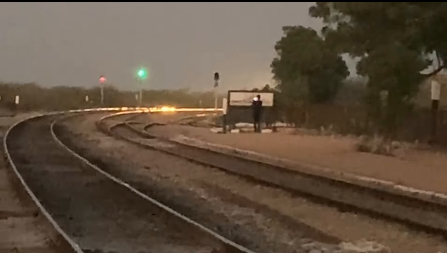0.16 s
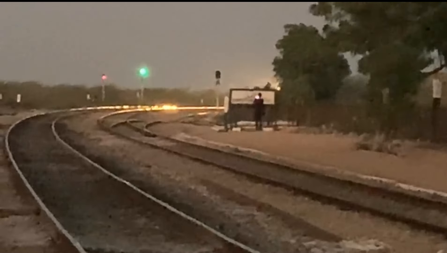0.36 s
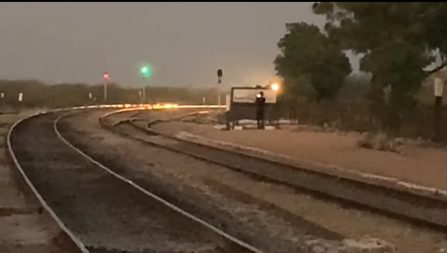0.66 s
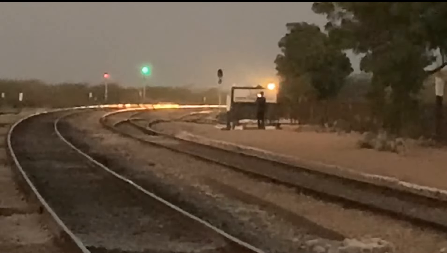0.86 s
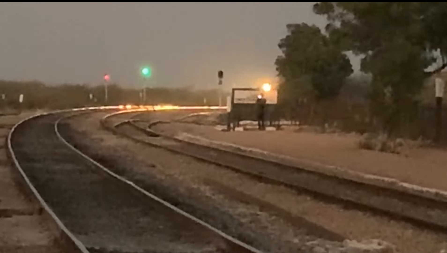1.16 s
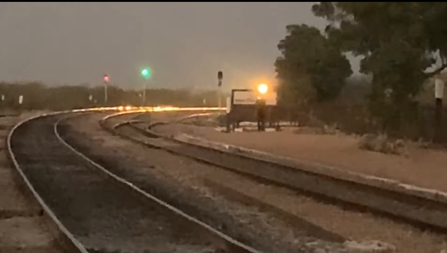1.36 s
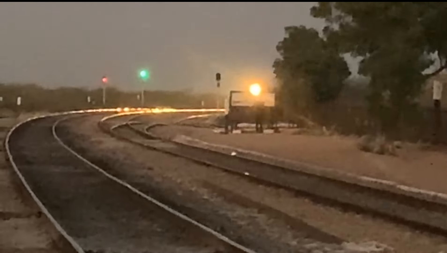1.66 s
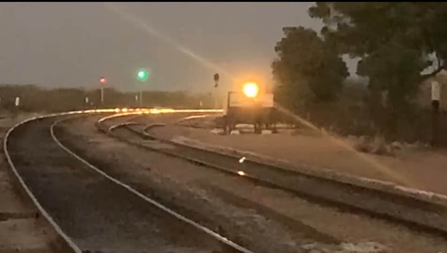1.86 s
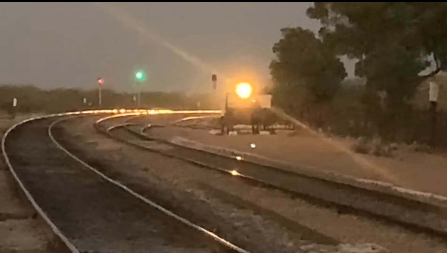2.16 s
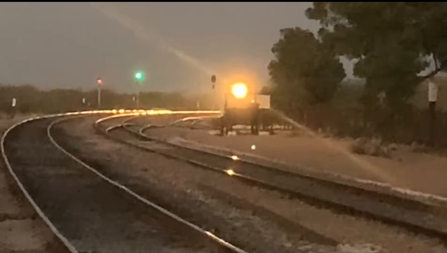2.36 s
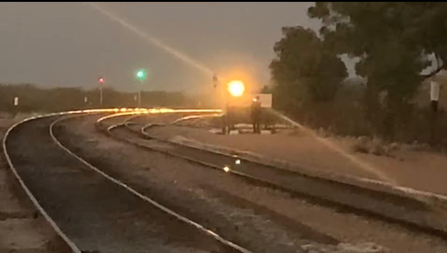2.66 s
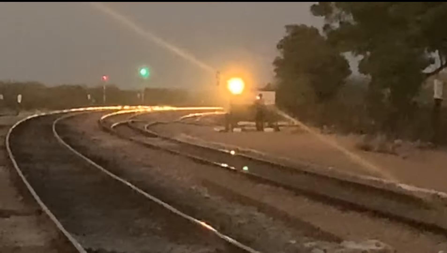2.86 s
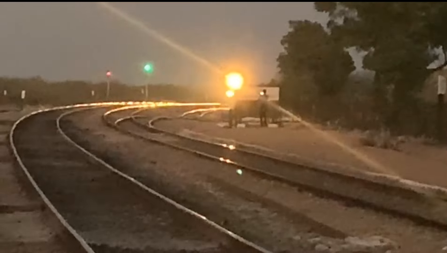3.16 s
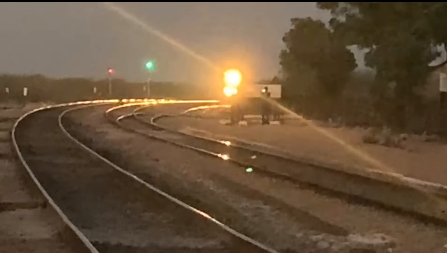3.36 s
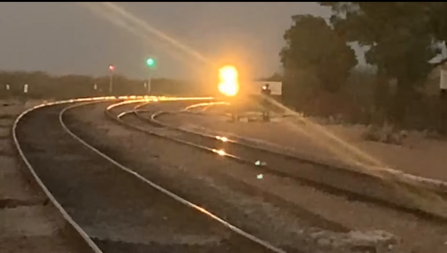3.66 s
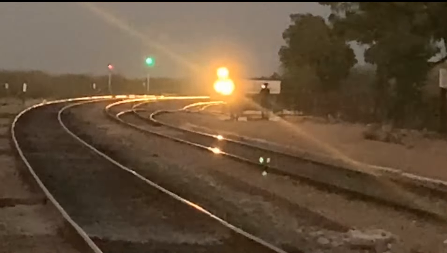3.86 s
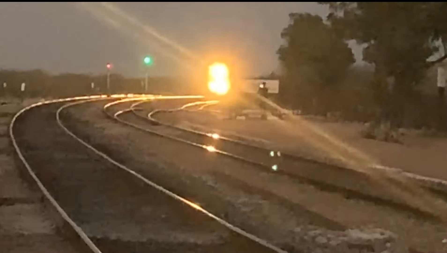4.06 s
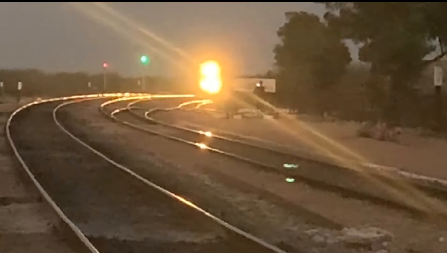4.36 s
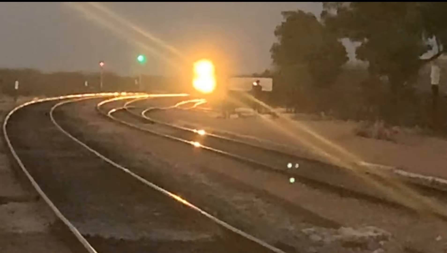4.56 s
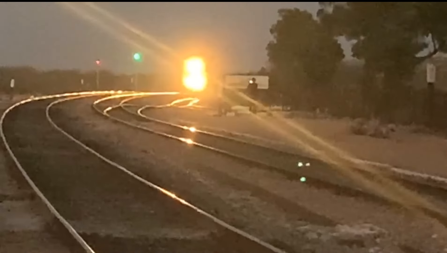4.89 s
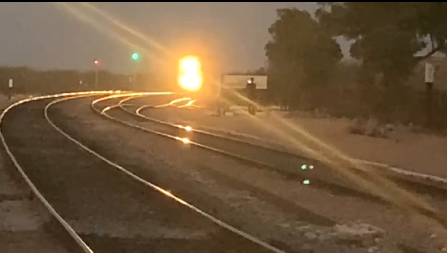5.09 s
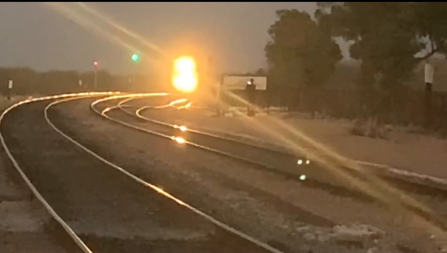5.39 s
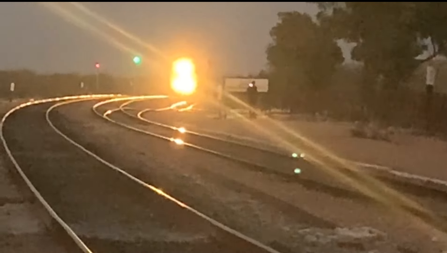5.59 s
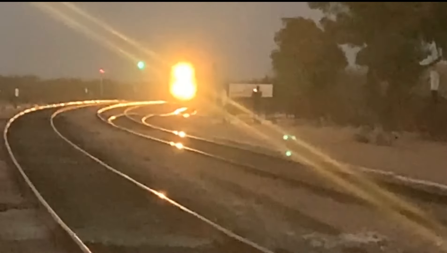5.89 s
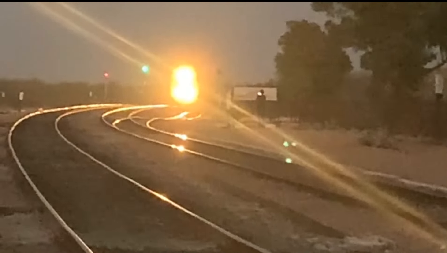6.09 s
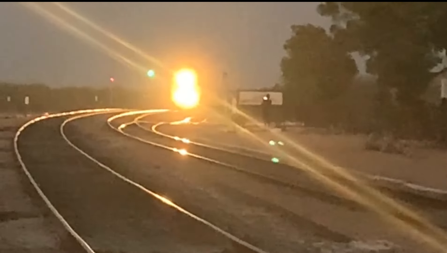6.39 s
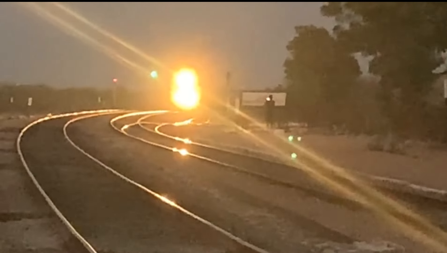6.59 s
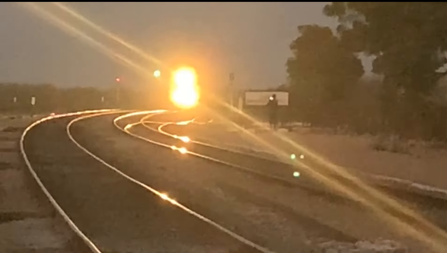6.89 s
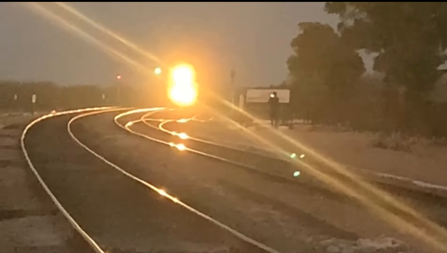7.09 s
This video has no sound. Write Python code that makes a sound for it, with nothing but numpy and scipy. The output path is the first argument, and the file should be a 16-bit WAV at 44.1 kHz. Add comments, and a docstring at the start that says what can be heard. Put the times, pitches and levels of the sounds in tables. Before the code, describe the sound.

A diesel locomotive throbs closer along a curve at dusk, a small bird trilling, until a loud two-note air horn blares out at the end.

```python
"""A diesel locomotive draws near at dusk: summed exhaust tones throb over noise-made wheels and fans.
Trees shade the exhaust at first; then a small bird trills in short falling sine notes amid soft gusts.
The level dips briefly, and a two-chime air horn starts inside the dip, muffled for an instant.
It opens and blares on, growing as the train nears: two sets of harmonics plus their sum tones,
all fluttering with the engine's firing, with rushing air and a brassy edge. A faint hiss lies beneath."""
import sys
import numpy as np
from scipy import signal
from scipy.fft import rfft, irfft, next_fast_len
from scipy.io import wavfile
from scipy.ndimage import uniform_filter1d

SR = 44100
rng = np.random.default_rng(int(sys.argv[2]) if len(sys.argv) > 2 else 0)


def bounce(signal):
    """Save signal as a 16-bit WAV file at the path given by the first command-line argument."""
    frames = np.transpose(np.atleast_2d(signal))
    limited = np.clip(frames, -1, 1)
    pcm = np.round(limited * 32767).astype(np.int16)
    wavfile.write(sys.argv[1], SR, pcm)


N = 319284
TIME = np.arange(N) / SR
EARS = np.array([[0.5], [-0.5]])   # shares a left-right difference equally between the two channels

# Levels in the tables are relative; the layers that use them trim them further.
# Lengths of swells and fades run from the centre to 1/e.

CYCLE_HZ = 8.068        # one round of all six cylinders, on average
STRONG_BEAT_S = 2.908   # a moment at which the loudest cylinder fires
SHADE_DB, IN_SIGHT_S = 5.5, 1.4   # trees shade the exhaust by this much at first, and not at all from this time
# Exhaust tones; the multiple is rounded for pitch:
# (multiple of the cycle rate, far level [dB], near level [dB])
EXHAUST_TONES = [(6, -42, -38), (7, -56, -53.5), (8, -58.5, -46.5), (9, -54, -42), (12.04, -47, -46.5),
                 (13, -53, -53.5), (15.05, -43.5, -48), (16, -58.5, -57.5), (17, -59.5, -61),
                 (18, -48, -51.5), (19, -66, -52.5), (20.1, -49, -47), (21, -49.5, -45), (22, -54, -53),
                 (22.9, -57, -58), (24.1, -64.5, -63.5), (26, -65.5, -62.5), (26.685, -54.5, -51),
                 (27.6, -56.5, -51), (31, -74, -64), (32, -74, -65)]

BOOM_DB, BOOM_GROWTH_DB_PER_S = -44.5, 1.08   # start before shading, and growth as the train nears
# Colour of the low boom: (frequency [Hz], density [dB per Hz])
BOOM_COLOUR = [(13, -29.5), (22, -7), (53, 6.5), (157, -12), (181, -6.5), (238, -10.5), (297, -40),
               (349, -39.5), (420, -36), (550, -57), (920, -120)]

# Roar of the wheels: (time [s], level [dB])
WHEEL_ROAR_LEVEL = [(0, -59.5), (0.2, -55.5), (0.8, -55.5), (1.05, -55.5), (1.27, -58), (1.45, -55.5),
                    (1.76, -56.5), (1.95, -60.5), (2.5, -57), (2.9, -54.5), (3.4, -55.5), (4.1, -60),
                    (4.55, -62), (4.82, -60.5), (5.05, -58), (5.37, -56.5), (5.8, -58.5)]
# Colour of the wheels at first: (frequency [Hz], density [dB per Hz])
WHEELS_FIRST_COLOUR = [(300, -45), (528, -17), (617, -16.5), (792, 3.5), (858, -11), (984, -10),
                       (1150, -24.5), (1500, -43), (2530, -120)]
# Colour of the wheels later: (frequency [Hz], density [dB per Hz])
WHEELS_LATER_COLOUR = [(300, -45.5), (545, -22.5), (787, -0.5), (832, -3), (858, -18.5), (1010, -10.5),
                       (1150, -23.5), (1500, -45.5), (2530, -120)]
# Low rumble of the wheels: (time [s], level [dB])
WHEEL_RUMBLE_LEVEL = [(0, -60), (.45, -60), (.7, -57.5), (1.3, -57), (1.8, -55), (2.3, -55), (2.8, -56),
                      (3.35, -57.5), (3.65, -63), (4.35, -63), (4.8, -59.5), (5.35, -58.5), (5.8, -62.5)]
# Colour of the rumble: (frequency [Hz], density [dB per Hz])
RUMBLE_COLOUR = [(170, -27.5), (265, 2), (320, 0), (390, -3), (440, -4), (540, -16), (680, -24.5),
                 (1200, -71)]
# Wheels knocking over rail joints: (time [s], level [dB], length [s])
RAIL_KNOCKS = [(1.5, -54, 0.014), (1.625, -51, .015), (1.733, -49, 0.02), (3.446, -57, 0.028),
               (4.762, -52, 0.02), (5.38, -60, 0.017), (5.834, -46, 0.015)]
# Colour of a knock: (frequency [Hz], density [dB per Hz])
KNOCK_COLOUR = [(200, 2), (420, -3), (560, -10), (720, 5), (1050, -15), (1400, 8), (2000, -9), (2500, -8),
                (3500, -22), (4300, -25), (6000, -60)]

TREBLE_HZ, TREBLE_SWING = 2120, 0.99   # treble corner; dB of extra treble per dB the fans get louder
# Rush of the fans: (time [s], level [dB])
FAN_RUSH_LEVEL = [(0, -59.5), (0.42, -57.5), (0.75, -58.5), (1.25, -57.5), (1.73, -56), (1.9, -57.0),
                  (2.45, -55), (2.75, -53.5), (3.42, -53.5), (3.65, -56.5), (4.5, -56), (4.78, -54),
                  (4.92, -55.0), (5.55, -51), (5.8, -52)]
# Colour of the fans: (frequency [Hz], density [dB per Hz])
FAN_COLOUR = [(680, -35), (1150, -14), (1570, 4), (1800, -5.5), (2020, -18), (2400, -5.5), (2850, -23),
              (3160, -14.5), (3710, -26), (4060, -33.5), (4360, -35), (4800, -54), (6240, -77.5),
              (10600, -120)]

# Level changes of the train's layers from the moment the horn opens
CLOSE_BOOM_DB, CLOSE_RUMBLE_DB, CLOSE_WHEELS_DB, CLOSE_FANS_DB = 1, 5, 6.5, 0.5

LOW_HZ, HIGH_HZ = 409.8, 553.1   # settled pitches, about a fourth apart
LOW_START_S, HIGH_START_S, OPEN_S = 6.183, 6.197, 6.306   # the chimes start, then the muffling lifts
LOW_DB, HIGH_DB, BLAST_GROWTH_DB_PER_S = 0.5, 0.62, 0.5   # trims at the first chime, and growth
# Low chime harmonics: (multiple, far level [dB], near level [dB])
LOW_HARMONICS = [(1, -37.5, -37), (2, -30, -27), (3, -36, -28), (4, -39, -28.5), (5, -35.5, -47),
                 (6, -30, -40), (7, -37.5, -38.5), (8, -39.5, -42), (9, -45.5, -44), (10, -60, -46),
                 (11, -64, -48), (12, -58, -60.5), (13, -62.5, -60.5), (14, -65, -66), (15, -68, -66.5),
                 (16, -72.5, -76), (17, -73, -74), (18, -87, -87.5)]
# High chime harmonics: (multiple, far level [dB], near level [dB])
HIGH_HARMONICS = [(1, -36, -38.5), (2, -32.5, -32.5), (3, -36, -22.5), (4, -29.5, -29.5), (5, -38.5, -37),
                  (6, -33.5, -40.5), (7, -45, -46.5), (8, -56.5, -47.5), (9, -57, -69), (10, -66.5, -69),
                  (11, -63, -65), (12, -80.5, -72), (13, -88, -73)]
# Sum tones of the two chimes:
# (multiple of the low chime, multiple of the high chime, far level [dB], near level [dB])
CHIME_SUMS = [(1, 1, -48, -51.5), (1, 2, -51.5, -52.5), (1, 5, -57.5, -73.5), (2, 1, -37, -47.5),
              (2, 2, -57, -50), (2, 3, -37.5, -43), (2, 4, -62, -67.5), (2, 5, -55.5, -48),
              (2, 6, -61, -48.5), (2, 7, -63, -64), (2, 8, -72, -67.5), (3, 1, -47, -67),
              (3, 2, -66.5, -53), (3, 3, -55.5, -61), (3, 5, -62, -67.5), (3, 6, -63.5, -62.5),
              (4, 1, -60, -51.5), (4, 2, -64.5, -50.5), (4, 3, -60, -59.5), (4, 6, -70.5, -69.5),
              (4, 7, -81, -75.5), (5, 3, -61, -64.5), (5, 4, -63.5, -57.5), (5, 5, -70, -75.5),
              (6, 3, -65.5, -50.5), (6, 4, -69.5, -66), (6, 5, -72.5, -77.5), (6, 7, -74, -67.5),
              (7, 3, -56.5, -60), (7, 7, -81, -77.5), (8, 6, -81, -82)]
# The horn's colour passes from far to near: (time [s], nearness [0-1])
HORN_NEARNESS = [(6.45, 0), (6.58, .25), (6.65, .6), (6.8, .85), (6.97, 1)]
# Colour of the horn's muffled first instant: (frequency [Hz], level [dB])
MUFFLE_COLOUR = [(410, -15.5), (553, -2), (820, -1), (1150, -8), (1400, -13.5), (1650, -16), (2050, -22),
                 (2250, -31), (2480, -34), (2800, -16), (3300, -36), (3800, -20.5), (4400, -23),
                 (4800, -21), (5400, -40), (7000, -46)]
# How the exhaust shakes the horn: (multiple of the cycle rate, depth [ratio])
FIRING_SHAKE = [(6, 1.5), (7, 0.32), (12, 0.37), (15, 0.43), (20, 0.12)]
# How deeply the far horn's partials flutter: (frequency [Hz], depth [ratio])
FAR_FLUTTER = [(410, .08), (820, 0.21), (1230, .36), (1380, .9), (1640, 0.82), (2050, 0.47), (2460, .25),
               (3300, 0.065), (7000, .75)]
# How deeply the near horn's partials flutter: (frequency [Hz], depth [ratio])
NEAR_FLUTTER = [(410, .08), (820, 0.14), (1230, 0.16), (1640, .42), (2050, 1), (2460, 0.23), (3300, 0.092),
                (7000, .75)]
# Momentary fades of single partials: (frequency [Hz], time [s], change [dB], length [s])
PARTIAL_FADES = [(410, 6.3, -8.5, 0.052), (410, 6.75, -3.5, 0.18), (553, 6.31, -4, 0.013),
                 (820, 6.5, -12, 0.02), (820, 6.61, -4, 0.026), (820, 6.82, -4, 0.028),
                 (820, 6.5, -8, 0.033), (1106, 6.52, -3.5, 0.073), (1229, 6.67, -14, 0.022),
                 (1229, 6.78, -16, .025), (1229, 6.89, -13, 0.037), (1639, 6.5, -4, 0.037),
                 (1659, 6.48, -10.5, 0.059), (2049, 7.0, -16, .08), (2212, 6.5, -5.5, 0.14),
                 (2212, 7.2, -7.5, .12), (2470, 7.03, -15.5, 0.069), (2765, 6.77, -7, 0.11),
                 (2869, 7.02, -22, 0.082), (2869, 7.22, -14, 0.06), (3278, 7.13, -10, 0.12),
                 (3319, 6.99, -12.5, 0.075), (3688, 7.22, -16.5, 0.075), (3872, 6.66, -19, 0.11)]
# Air rushing through the horn: (time [s], level [dB])
AIR_LEVEL = [(6.3, -35), (6.55, -38), (6.8, -39.5), (7.24, -41.5)]
# Colour of that air: (frequency [Hz], density [dB per Hz])
AIR_COLOUR = [(160, -55), (280, -42), (492, -12.5), (549, -18.5), (629, -27), (806, -11.5), (1020, -14.5),
              (1090, -7), (1430, -14.5), (1620, -8.5), (1810, -27), (1980, -9.5), (2260, -21), (3050, -37),
              (3360, -28), (4500, -31), (5200, -41.5), (6300, -39), (7100, -40), (7450, -50), (9680, -92.5),
              (16400, -120)]
# Faint murmur during the dip, with a short bump before the horn: (time [s], level [dB])
MURMUR_LEVEL = [(5.8, -71), (5.9, -66), (6.145, -66.5), (6.158, -54), (6.18, -58), (6.3, -71)]
# Stereo placing of the horn: (frequency [Hz], left over right [dB])
HORN_BALANCE = [(600, -0.5), (820, -3), (1106, -7.5), (1229, -1), (1650, -4), (2049, 0.5), (2212, 4),
                (2460, .5), (2869, -1.5), (3300, -5.5), (3700, -4), (7000, -4.5)]
# Stereo phase of the horn: (frequency [Hz], lead of the left [rad])
HORN_PHASE = [(600, -0.22), (820, -0.33), (1106, -1.37), (1229, 0.26), (1373, 1), (1650, 0.72), (2049, 2),
              (2212, -.5), (2460, 0.34), (2765, 1.7), (2869, 1.56), (3300, 1.08), (7000, 1.74)]
# Left-right likeness of the horn's air: (frequency [Hz], likeness [0-1])
AIR_LIKENESS = [(600, 0.93), (1100, 0.67), (1700, 0.83), (2050, .55), (2400, .9), (3000, .7), (7000, .65)]

# Bird trills: (time [s], level [dB], notes [count])
BIRD_TRILLS = [(.829, -60.5, 9), (2.082, -59, 10), (3.144, -59, 10), (4.102, -58.5, 10), (5.105, -58, 10)]
# Onsets of the notes within a trill: (time from the first note [s])
NOTE_OFFSETS = [0, .028, .057, .085, .114, .146, .183, .226, .272, .319]

# Wind gusts: (time [s], level [dB], length [s])
WIND_GUSTS = [(0.45, -41.5, 0.048), (0.77, -33.5, 0.053), (0.93, -32.5, 0.044), (3.554, -34.5, 0.037),
              (3.947, -43, .1), (4.904, -32, 0.04), (5.526, -34.5, 0.23), (5.81, -36.5, 0.034)]
# Brief dip of the train, gusts and bird: (time [s], level [dB])
SURROUNDINGS_DIP = [(5.84, 0), (5.86, -16), (5.91, -25), (6.305, -22.5), (6.325, 2)]
# Stereo placing of the surroundings: (frequency [Hz], left over right [dB])
AROUND_BALANCE = [(500, 0), (620, -1.5), (760, -10), (830, -6.5), (890, 1.5), (1030, -3.5), (1200, 0),
                  (1500, -5.5), (1850, -2.5), (2080, 3), (2450, -0.5), (4000, -1)]
# Stereo phase of the surroundings: (frequency [Hz], lead of the left [rad])
AROUND_PHASE = [(50, -0.46), (100, -0.2), (160, -0.5), (320, -1.53), (420, -1.2), (650, -0.7), (780, -3),
                (850, -3.5), (950, -5.5), (1150, -5.5), (1300, -6), (1600, -6), (2000, -5.5), (2150, -6.5),
                (2450, -7), (2850, -5), (4000, -5.5)]
# Left-right likeness of the surroundings: (frequency [Hz], likeness [0-1])
AROUND_LIKENESS = [(30, 1), (170, 0.85), (310, .25), (450, 0.43), (650, 0.34), (850, 0.76), (1150, 0.76),
                   (1500, 0.95), (1800, .85), (2050, .2), (2400, 1), (2850, 0.62), (4300, .9), (8000, .2)]

MONO_BELOW_HZ, WIDENS_S = 630, 3.52   # the bass is mono until this time, and again under the horn
CUTOFF_HZ = 10900


def train(crank):
    """Exhaust beats and boom, with the roar, rumble and knocks of wheels and the rush of fans."""
    shade_db = SHADE_DB * np.clip(1 - TIME / IN_SIGHT_S, 0, 1)
    close = TIME > OPEN_S
    beats = rise(0, 0.0084) * from_db(-shade_db) * exhaust(crank, waver_db=1.0, scatter=0.8)
    rolling = wheel_rumble(close) + wheel_roar(close) + fans(crank, close)
    return beats + boom(shade_db, close) + patchy(rolling, depth_db=1.5, size=10) + knocks()


def exhaust(crank, waver_db, scatter):
    """Harmonics of the cylinder cycle, loosely aligned so that one firing per round stands out."""
    nearness = np.minimum(TIME / OPEN_S, 1) ** 2.5
    out = 0
    for multiple, far_db, near_db in EXHAUST_TONES:
        wander = 0.68 * (multiple / 20) ** 2 * drift(2.3)
        shift = scatter * (rng.standard_normal() + wander)
        lead = EARS * at_hz(AROUND_PHASE, multiple * CYCLE_HZ)
        level = from_db(far_db + (near_db - far_db) * nearness + waver_db * drift(2.5))
        out = out + level * np.cos(round(multiple) * crank + shift + lead)
    return np.sqrt(2) * out


def boom(shade_db, close):
    """Low noise that grows as the train nears, half as shaded by the trees as the exhaust."""
    growth_db = BOOM_GROWTH_DB_PER_S * np.minimum(TIME, OPEN_S)
    level_db = BOOM_DB + growth_db + CLOSE_BOOM_DB * close - 0.5 * shade_db
    thin_bottom = signal.butter(3, 38, "high", fs=SR, output="sos")   # below the firing rate
    return from_db(level_db) * signal.sosfilt(thin_bottom, noise(BOOM_COLOUR))


def wheel_roar(close):
    """Rolling noise that crossfades at equal power to a second colour at about 3.5 s."""
    level_db = curve(WHEEL_ROAR_LEVEL) + CLOSE_WHEELS_DB * close + surge(depth_db=0.34, per_s=7.0)
    crossfade = np.interp(TIME, [3.3, 3.65], [0, 1])
    first = np.sqrt(1 - crossfade) * noise(WHEELS_FIRST_COLOUR)
    later = np.sqrt(crossfade) * noise(WHEELS_LATER_COLOUR)
    return from_db(level_db) * (first + later)


def wheel_rumble(close):
    """The lower part of the rolling noise, with a level of its own."""
    return from_db(curve(WHEEL_RUMBLE_LEVEL) + CLOSE_RUMBLE_DB * close) * noise(RUMBLE_COLOUR)


def fans(crank, close):
    """Rushing noise that pulses with the firing and brightens as it gets louder."""
    level_db = curve(FAN_RUSH_LEVEL) + CLOSE_FANS_DB * close + surge(depth_db=0.32, per_s=6.8)
    rush = brighten(noise(FAN_COLOUR), TREBLE_SWING * (level_db - level_db.mean()))
    pulse = 1 + 0.1 * np.cos(6 * crank)
    return from_db(level_db) * rush * pulse


def knocks():
    """Distant wheel knocks: noise in rounded bumps, smeared by the way they travel."""
    return bumps(RAIL_KNOCKS) * noise(KNOCK_COLOUR)


def horn(crank, steepening, sums_db, air_db):
    """Two chimes and their sum tones with rushing air; the loud wave steepens into a brassy edge."""
    growth_db = BLAST_GROWTH_DB_PER_S * (TIME - LOW_START_S)
    nearness = curve(HORN_NEARNESS)
    low_phase = chime(LOW_HZ, LOW_START_S, jitter=0.0009)
    high_phase = chime(HIGH_HZ, HIGH_START_S, jitter=0.00046)
    phases = low_phase, high_phase
    # each firing swings the pitch (imaginary part) and the strength (real part)
    shake = sum(depth * (1j * np.sin(round(k) * crank) - 0.35 * np.cos(round(k) * crank))
                for k, depth in FIRING_SHAKE)
    low_rows = [(k, 0, far_db, near_db) for k, far_db, near_db in LOW_HARMONICS]
    high_rows = [(0, k, far_db, near_db) for k, far_db, near_db in HIGH_HARMONICS]
    low = partials(low_rows, phases, LOW_START_S, nearness, shake, fade_db=1.0, rough=0.17)
    high = partials(high_rows, phases, HIGH_START_S, nearness, 0.088 * shake, fade_db=0.84, rough=0.072)
    sums = partials(CHIME_SUMS, phases, HIGH_START_S, nearness, 0.5 * shake, fade_db=2.6, rough=0.26)
    chord = from_db(LOW_DB + growth_db) * low + from_db(HIGH_DB + growth_db) * high
    chord = chord + from_db(sums_db) * sums
    edge_band = signal.butter(4, [4200, 6800], "band", fs=SR, output="sos")
    edge = signal.sosfilt(edge_band, chord ** 2)   # squaring adds overtones
    return chord + steepening * edge + horn_air(air_db)


def chime(pitch_hz, start_s, jitter):
    """Phase of a diaphragm that starts sharp and settles."""
    sharp = 0.021 * np.exp(-np.maximum(TIME - start_s, 0) / 0.035)
    return 2 * np.pi * np.cumsum(pitch_hz * (1 + sharp + jitter * drift(25))) / SR


def partials(rows, phases, start_s, nearness, shake, fade_db, rough):
    """The engine shakes each partial, which also fades at random within a rough halo."""
    on = TIME > start_s
    out = np.zeros((2, N))
    opened = rise(OPEN_S, 0.0067)[on]
    for low, high, far_db, near_db in rows:
        low, high = round(low), round(high)
        hz = low * LOW_HZ + high * HIGH_HZ
        random_fade_db = fade_db * (hz / 1500) ** 0.71 * drift(5)
        level = from_db(far_db + (near_db - far_db) * nearness + fades(hz) + random_fade_db)[on]
        level = level * (opened + (1 - opened) * from_db(at_hz(MUFFLE_COLOUR, hz)))
        scatter = drift(73) + 1j * drift(74)
        scatter = scatter + EARS * (drift(40) + 1j * drift(40))   # partly different left and right
        halo = rough * (hz / 1500) ** 0.43 * (1.4 - 0.18 * nearness) * scatter
        flutter = at_hz(FAR_FLUTTER, hz) * (1 - nearness) + at_hz(NEAR_FLUTTER, hz) * nearness
        wobble = 1 + (0.35 + 0.5 * opened) * (flutter * shake + halo)[:, on]
        phase = (low * phases[0] + high * phases[1])[on] + rng.uniform(0, 2 * np.pi)
        stereo = from_db(EARS * at_hz(HORN_BALANCE, hz)) * np.exp(1j * EARS * at_hz(HORN_PHASE, hz))
        out[:, on] += np.real(level * wobble * stereo * np.exp(1j * phase))
    return np.sqrt(2) * out * rise(start_s, 0.0093)


def fades(hz):
    """The dips in one partial's level, in dB."""
    own = [row for row in PARTIAL_FADES if abs(row[0] - hz) < 8]
    return sum(db * np.exp(-((TIME - s) / length) ** 2) for _, s, db, length in own)


def horn_air(air_db):
    """Air rushing through the opened horn: patchy noise with softened treble."""
    rush = patchy(noise(AIR_COLOUR, HORN_PHASE, HORN_BALANCE, AIR_LIKENESS), depth_db=4.5, size=30)
    rush = from_db(curve(AIR_LEVEL)) * rush * rise(OPEN_S, 0.0055)
    return from_db(air_db) * signal.sosfilt(signal.butter(1, 2800, fs=SR, output="sos"), rush)


def bird(note_hz, fall_hz_per_s, note_s):
    """Each trill slows and swells; every note holds briefly while it slurs downwards."""
    out = np.zeros(N)
    for s, db, count in BIRD_TRILLS:
        for offset in NOTE_OFFSETS[:round(count)]:
            near = np.abs(TIME - s - offset) < 4 * note_s
            t = TIME[near] - s - offset
            grown = 1 - 0.64 * np.exp(-offset / 0.18)
            centre_hz = note_hz + 200 * (grown - 1)   # early notes sit a little lower
            turns = centre_hz * t - fall_hz_per_s * t * t / 2
            envelope = np.exp(-np.abs(t / (note_s * np.sqrt(grown))) ** 3)
            out[near] += from_db(db) * grown * envelope * np.sin(2 * np.pi * turns)
    return out


def trackside(x, echo_db, tail_s):
    """Bushes and trees scatter a short diffuse tail."""
    t = TIME[:SR // 4]
    tail = rng.standard_normal((2, len(t))) * np.exp(-t / tail_s)
    tail /= np.sqrt(np.sum(tail ** 2, axis=1, keepdims=True))
    return x + from_db(echo_db) * signal.fftconvolve(x[None], tail, axes=1)[:, :N]


def gusts():
    """Short lumps of low wind noise."""
    return bumps(WIND_GUSTS) * noise([(20, -17.0), (55, 9.5), (110, -1.5), (250, -14.5), (600, -47.0), (2000, -73)])


def murmur():
    """Faint noise in a broad peak near 840 Hz, heard during the dip."""
    peak = noise([(500, -32.5), (700, -13.0), (840, 2), (1000, -11.5), (1600, -35.5), (4000, -62)])
    return from_db(curve(MURMUR_LEVEL)) * peak * rise(MURMUR_LEVEL[0][0], 0.044)


def hiss():
    """Faint steady noise under everything."""
    return from_db(-85.0) * noise([(1000, -0.5), (5000, -2.5), (7000, -6.5), (9500, 1.5), (11000, -9.0)])


def noise(spectrum, leads=AROUND_PHASE, pans=AROUND_BALANCE, likeness=AROUND_LIKENESS):
    """Coloured stereo noise from a shared and an opposed part; its middle has rms 1."""
    size = next_fast_len(N)
    hz = np.arange(size // 2 + 1) * SR / size
    shared, own = rfft(rng.standard_normal((2, size))) * from_db(at_hz(spectrum, hz))
    alike = np.clip(at_hz(likeness, hz), 0, 0.995)
    lead = at_hz(leads, hz)
    pan = from_db(EARS * at_hz(pans, hz))
    shared, own = shared * np.sqrt(1 + alike), own * np.sqrt(1 - alike)
    stereo = pan * np.array([shared + own, (shared - own) * np.exp(-1j * lead)])
    middle = np.sqrt(np.mean(pan ** 2, axis=0) + alike * np.cos(lead))   # evens out the mono sum
    out = irfft(stereo / middle, size)[:, :N]
    return out / np.std(out.mean(axis=0))


def patchy(x, depth_db, size):
    """Each narrow band swells and fades by itself at random, over about `size` frames of 6 ms."""
    bands = signal.stft(x, nperseg=512)[2]
    field = rng.standard_normal(bands.shape[1:])
    for _ in range(2):
        field = uniform_filter1d(field, size=3, axis=0)
        field = uniform_filter1d(field, size=size, axis=1)
    return signal.istft(bands * from_db(depth_db * rms_one(field)))[1][:, :N]


def brighten(x, db):
    """Raise or lower the treble."""
    treble = signal.sosfiltfilt(signal.butter(2, TREBLE_HZ, "high", fs=SR, output="sos"), x)
    return x + (from_db(db) - 1) * treble


def surge(depth_db, per_s):
    """A random swell and fade, in dB."""
    return depth_db * drift(per_s)


def drift(rate):
    """Slow chance with spread 1: noise through two equal low-pass poles at `rate` Hz."""
    step = 40   # samples between the random values
    pole = np.exp(-2 * np.pi * rate * step / SR)
    raw = rng.standard_normal(N // step + 2002)
    slow = signal.lfilter([1], [1, -2 * pole, pole * pole], raw)[2000:]   # settled part only
    return np.interp(np.arange(N) / step, np.arange(len(slow)), rms_one(slow))


def bumps(rows):
    """Gain of a series of rounded swells."""
    return sum(from_db(db) * np.exp(-((TIME - s) / length) ** 2) for s, db, length in rows)


def rise(start_s, length_s):
    """A smooth step from 0 to 1."""
    return 1 - np.exp(-np.maximum(TIME - start_s, 0) / length_s)


def curve(points):
    """A breakpoint curve, sample by sample."""
    s, values = np.transpose(points)
    return np.interp(TIME, s, values)


def at_hz(points, hz):
    """Read a spectrum on a log-frequency axis."""
    table_hz, values = np.transpose(points)
    return np.interp(np.log(np.maximum(hz, 1)), np.log(table_hz), values)


def from_db(db):
    """Decibels to gain."""
    return 10 ** (np.asarray(db) / 20)


def rms_one(x):
    """Scale to rms 1."""
    return x / np.sqrt(np.mean(x ** 2) + 1e-20)


def narrow_bass(x):
    """The bass sits in the middle at first, widens, and narrows again when the horn sounds."""
    mid, side = x.mean(axis=0), (x[0] - x[1]) / 2
    treble = signal.sosfiltfilt(signal.butter(4, MONO_BELOW_HZ, "high", fs=SR, output="sos"), side)
    width = rise(WIDENS_S, 0.23) - rise(LOW_START_S, 0.0194)
    return mid + np.sign(EARS) * (treble + width * (side - treble))


def scene():
    """Train, gusts and bird share the dip; a murmur and the horn join them, over a faint hiss."""
    speed = 1 + 0.00054 * drift(0.75)
    crank = 2 * np.pi * CYCLE_HZ * (np.cumsum(speed) / SR - STRONG_BEAT_S)
    song = trackside(bird(note_hz=4064, fall_hz_per_s=10500, note_s=0.0057), echo_db=-7.5, tail_s=0.052)
    surroundings = (train(crank) + gusts() + song) * from_db(curve(SURROUNDINGS_DIP))
    mix = surroundings + murmur() + horn(crank, steepening=0.2, sums_db=1.0, air_db=-0.5)
    dulled = signal.sosfilt(signal.ellip(8, 0.3, 60, 7400, fs=SR, output="sos"), mix)   # treble ends abruptly
    return dulled + hiss()


def record(dry):
    """Set the width of the bass over time, and cut the top."""
    return signal.sosfilt(signal.ellip(8, 0.3, 60, CUTOFF_HZ, fs=SR, output="sos"), narrow_bass(dry))


dry = scene()
out = record(dry)
bounce(out)
```